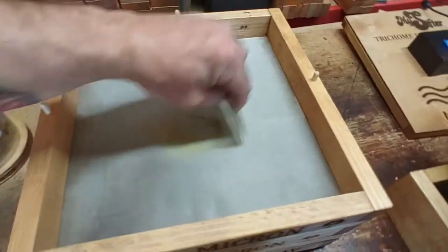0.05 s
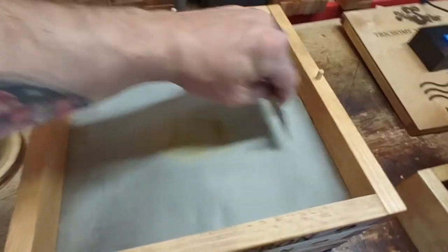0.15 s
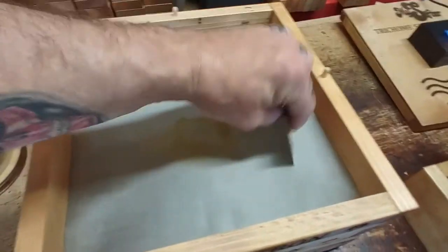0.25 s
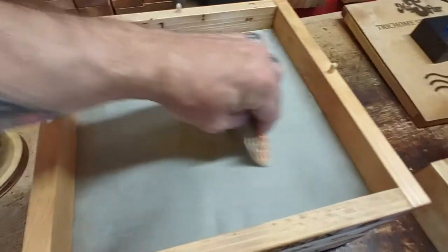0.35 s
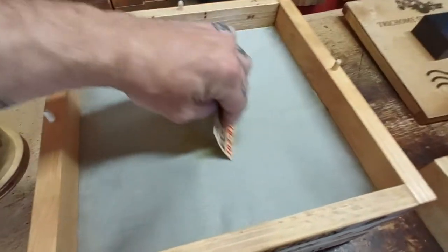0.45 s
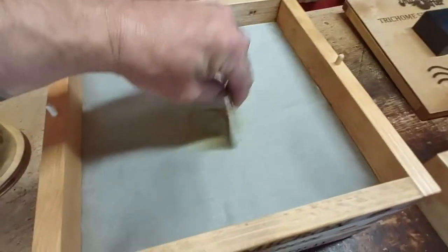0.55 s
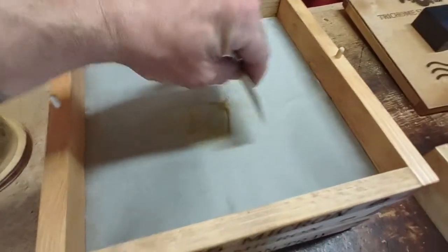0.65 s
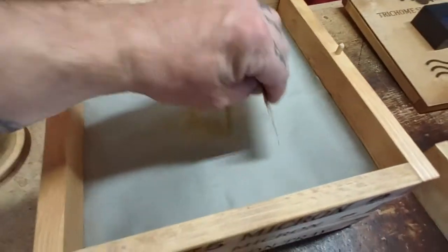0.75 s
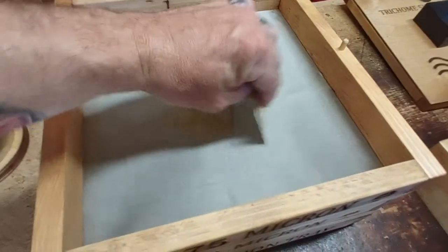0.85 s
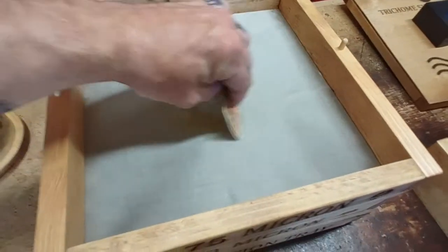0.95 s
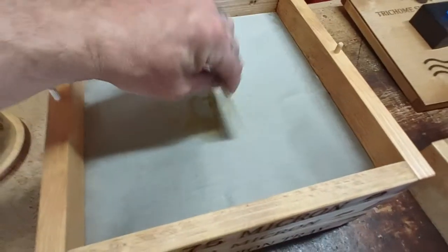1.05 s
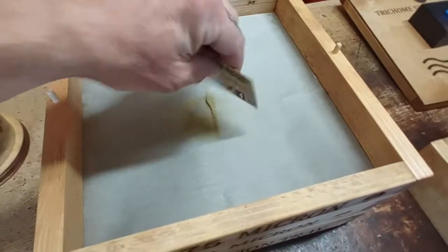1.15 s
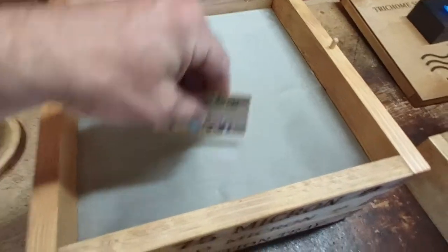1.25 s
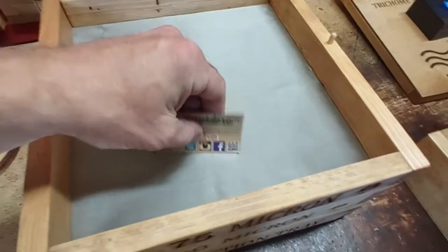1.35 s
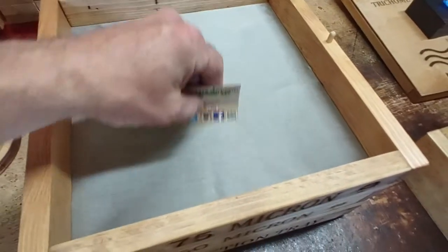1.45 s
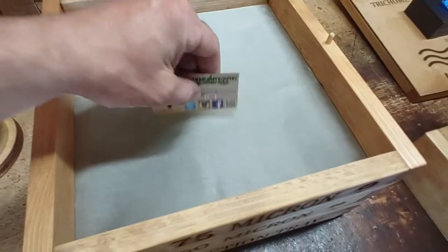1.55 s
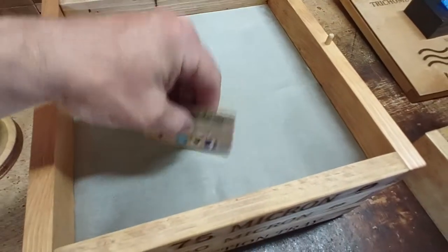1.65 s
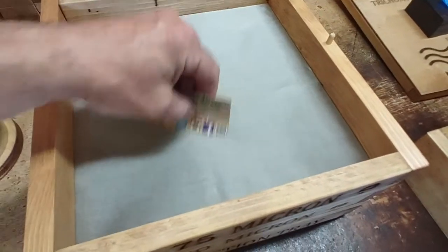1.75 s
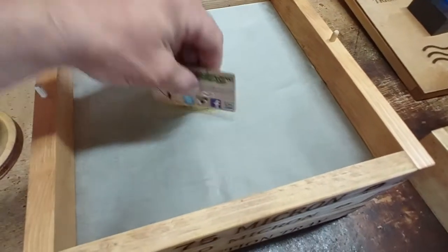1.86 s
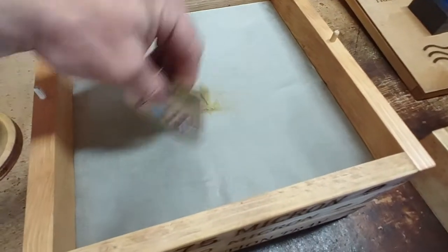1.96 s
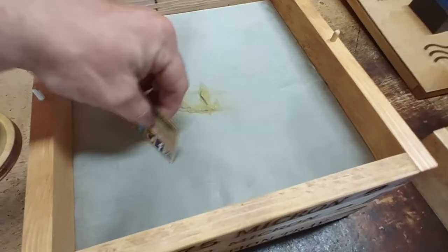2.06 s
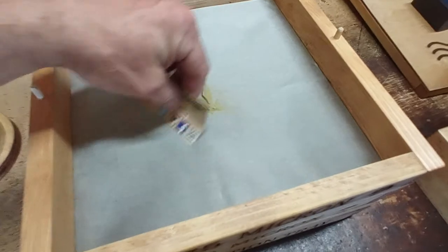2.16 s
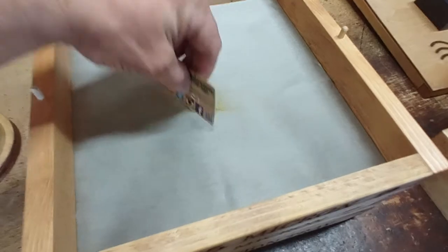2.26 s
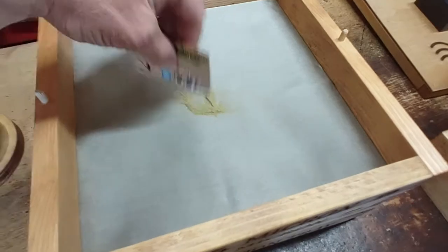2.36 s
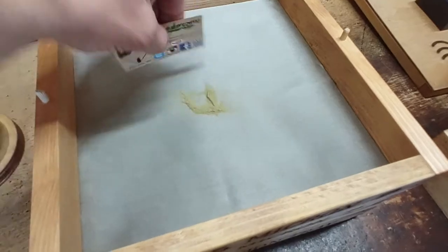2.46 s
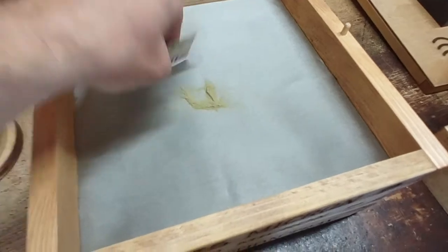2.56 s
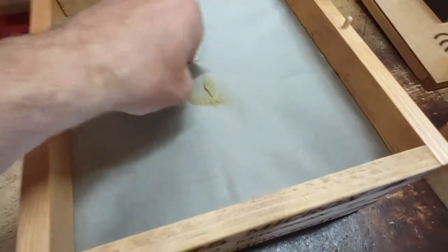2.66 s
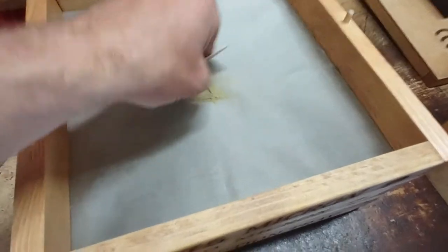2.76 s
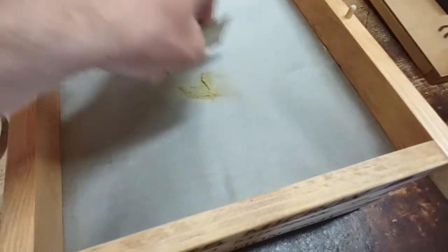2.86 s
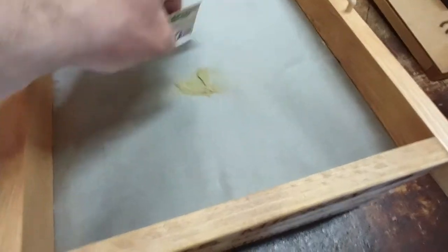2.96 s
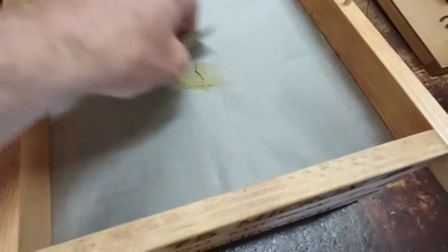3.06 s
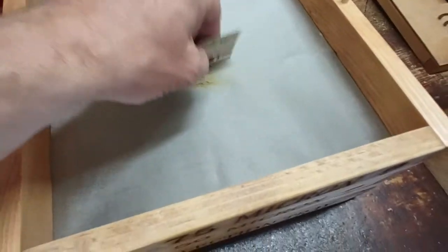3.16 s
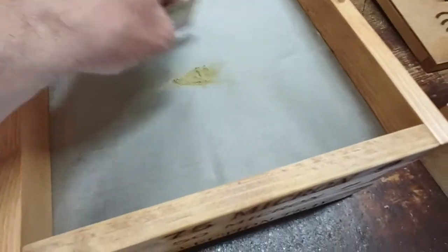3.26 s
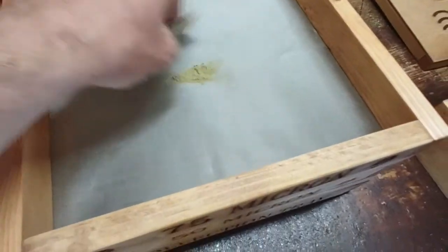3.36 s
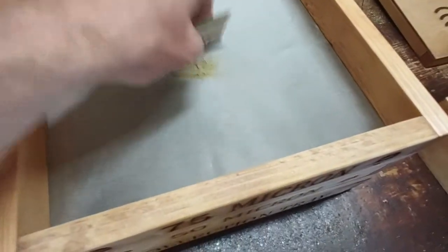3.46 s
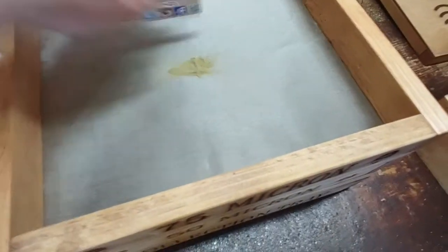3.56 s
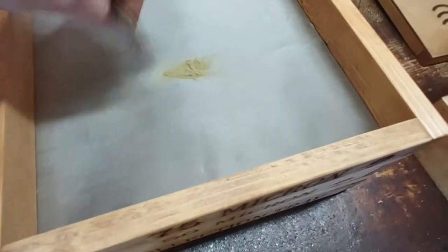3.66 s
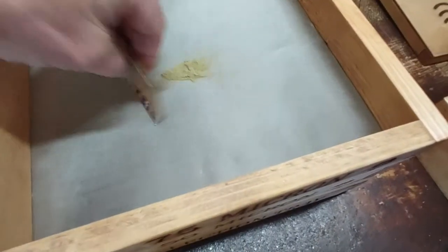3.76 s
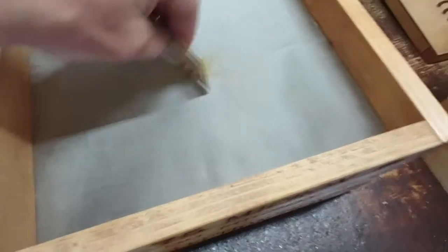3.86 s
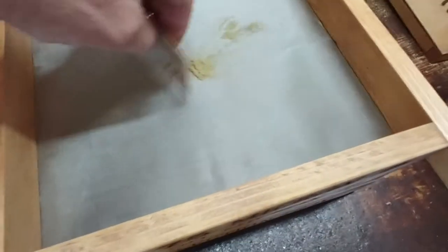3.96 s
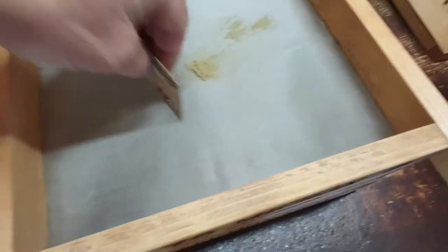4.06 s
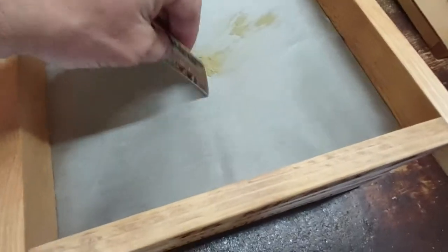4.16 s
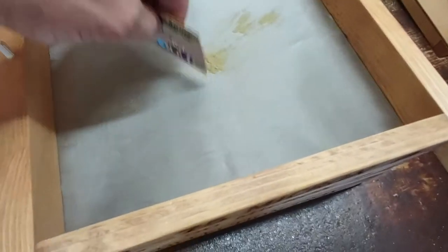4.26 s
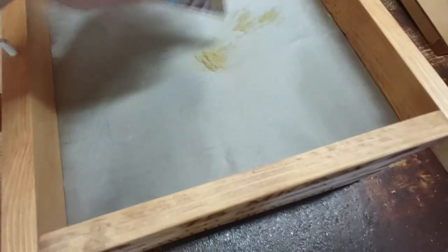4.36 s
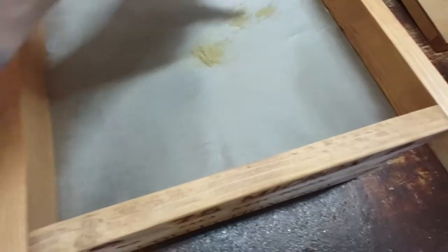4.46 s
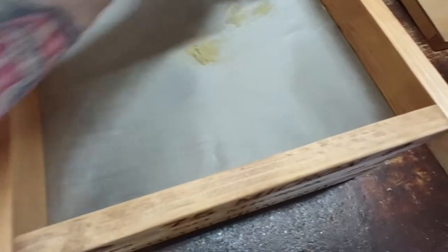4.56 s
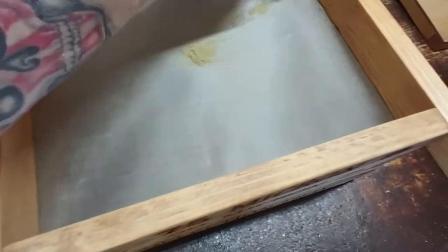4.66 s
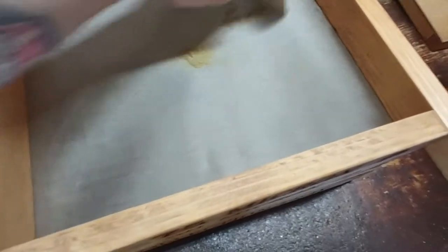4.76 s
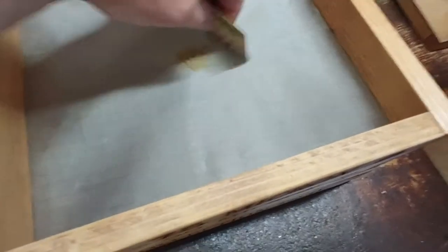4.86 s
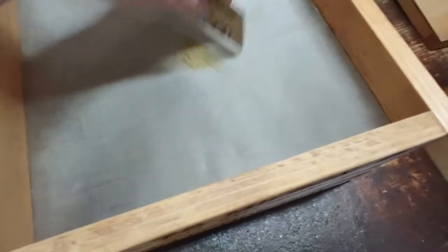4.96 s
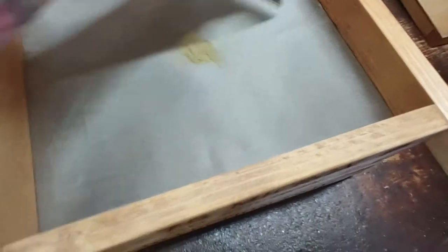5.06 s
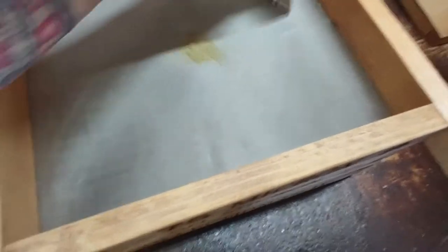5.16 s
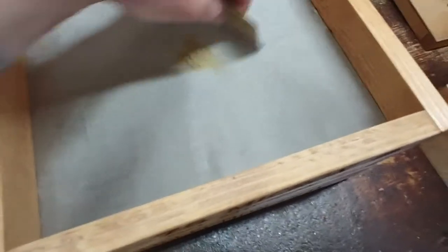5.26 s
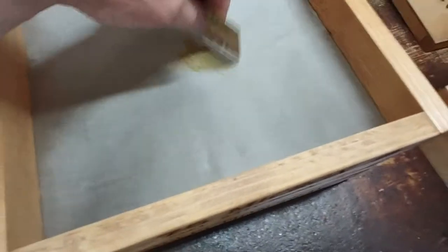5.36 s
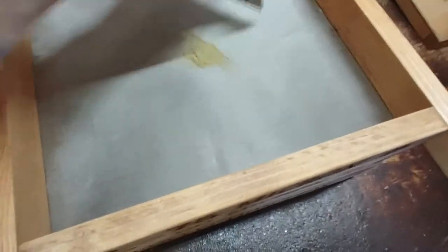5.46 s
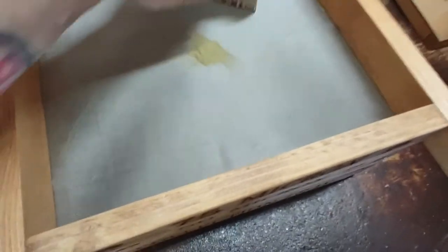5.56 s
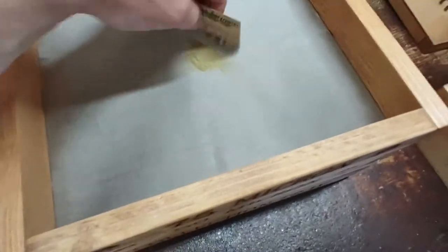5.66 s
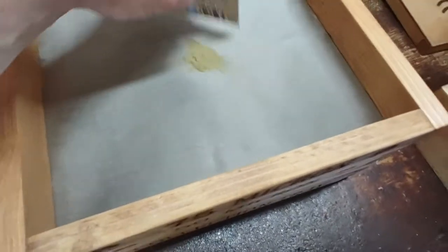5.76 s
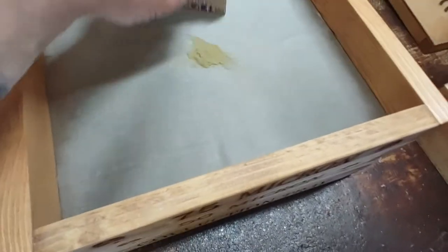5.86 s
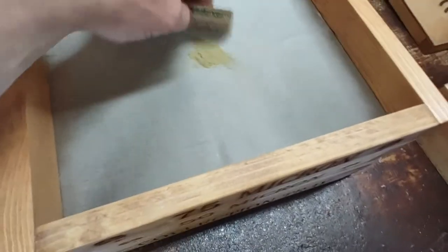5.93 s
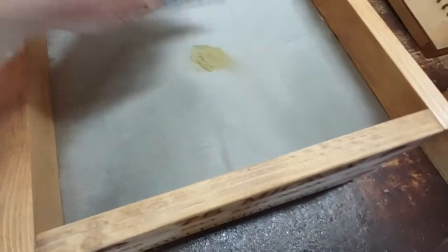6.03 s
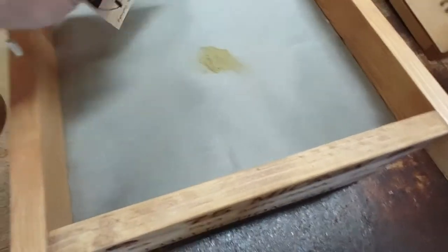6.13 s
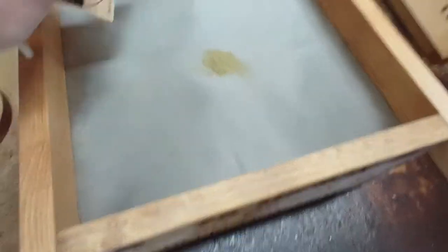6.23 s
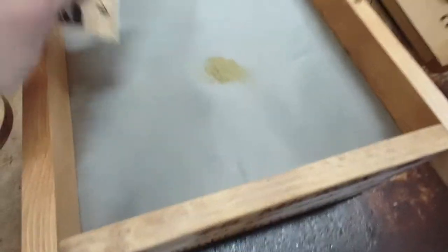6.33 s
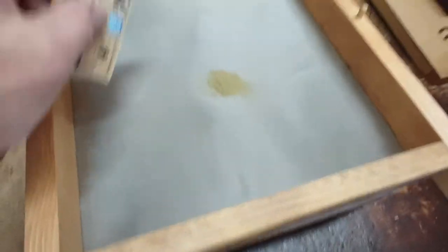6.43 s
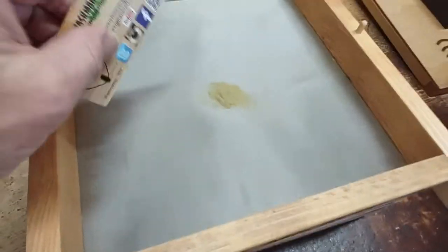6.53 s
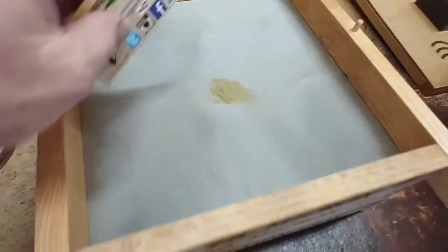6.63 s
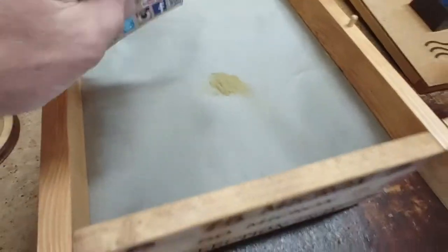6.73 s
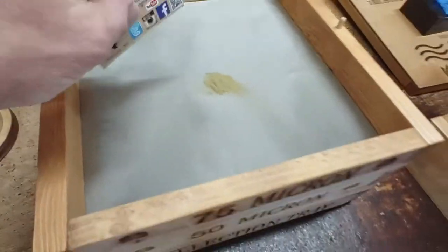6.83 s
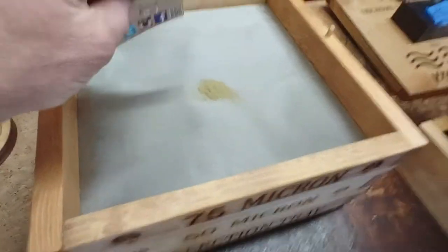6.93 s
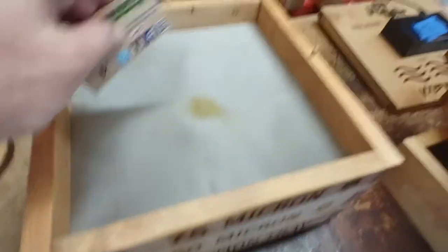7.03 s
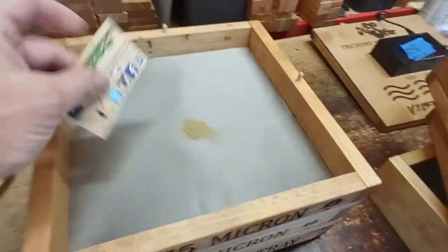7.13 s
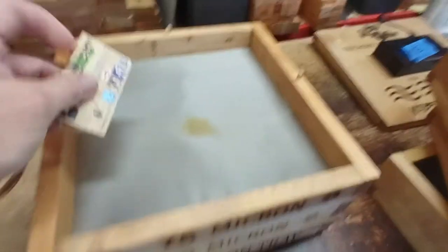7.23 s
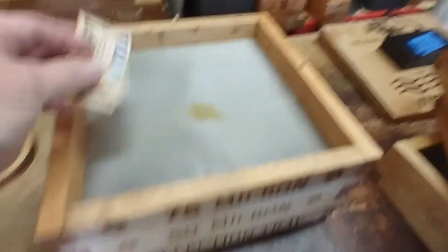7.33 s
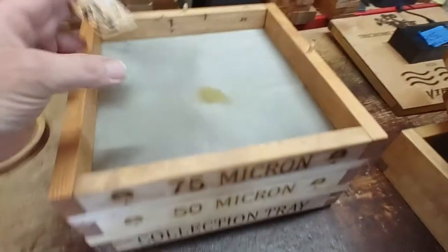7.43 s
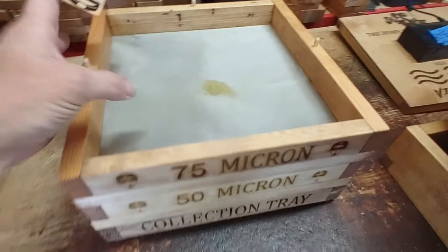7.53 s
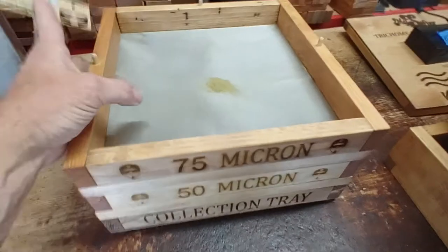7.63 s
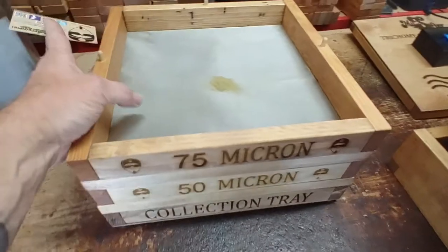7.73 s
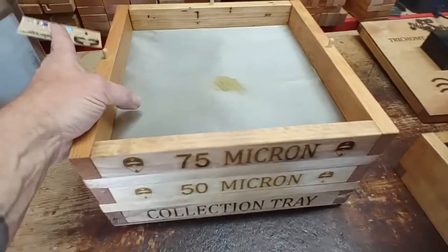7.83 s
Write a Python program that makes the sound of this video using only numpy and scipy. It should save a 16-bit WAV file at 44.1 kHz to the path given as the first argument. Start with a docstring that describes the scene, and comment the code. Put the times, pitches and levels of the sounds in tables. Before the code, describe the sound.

Crisp, gritty card scrapes and light taps on a stretched screen, with a car passing dully beyond the walls and a few final clicks.

```python
"""Card sweeping powder over a mesh

Close by in a small room a plastic card sweeps powder across a fine mesh stretched in a wooden frame.
Its edge rasps, brushes and taps as random catches on the threads; the card, mesh and frame click, hum and
knock. A car passes outside as swelling filtered noise with a low boom and a singing tyre note, muffled by
the walls. Room tone murmurs and hisses throughout; at the end the card is slid onto the bench."""
import sys
import numpy as np
from scipy import signal
from scipy.fft import rfft, irfft, next_fast_len
from scipy.io import wavfile
from scipy.ndimage import uniform_filter1d

SR = 44100
rng = np.random.default_rng(int(sys.argv[2]) if len(sys.argv) > 2 else 0)


def to_wav(s):
    """Save 16-bit WAV."""
    ch = np.atleast_2d(s).T  # columns
    pcm = np.round(np.clip(ch, -1, 1) * 32767)  # PCM
    wavfile.write(sys.argv[1], SR, pcm.astype(np.int16))


N = 347949
TIME = np.arange(N) / SR
TOUCH_SAMPLES = SR // 4
BRUSH_ONSET_S, BRUSH_FADE_DB_PER_S = .015, 299.5   # shared by the brushing and the slide


def from_db(db):
    """Decibels to gain."""
    return 10 ** (np.asarray(db) / 20)


def rms_one(x):
    """Scale to unit power."""
    return x / np.sqrt(np.mean(x ** 2) + 1e-20)


def freqs(n):
    """Frequencies in Hz of the bins of n samples, at least 1."""
    return np.maximum(np.arange(n // 2 + 1) * SR / n, 1)


def at_hz(points, hz):
    """Read a spectrum on a log-frequency axis."""
    f, value = np.transpose(points)
    return np.interp(np.log(hz), np.log(f), value)


def bell(hz, centre_hz, width):
    """Shape of a resonance, 1 on top; width is a share of the centre."""
    return 1 / (1 + (2 * (hz - centre_hz) / (width * centre_hz)) ** 2)


def panned(x, pan_db):
    """Make the left side of a stereo sound pan_db louder against the right."""
    return x * from_db([[pan_db / 2], [-pan_db / 2]])


def add(out, x, start_s):
    """Mix a stereo sound in at a time."""
    i = max(int(start_s * SR), 0)
    out[:, i:i + x.shape[1]] += x[:, :max(N - i, 0)]


def dying_noise(t60, size=16384):
    """A dense cloud of modes dying away, different on each side, of unit energy a side on average."""
    cloud = rng.standard_normal((2, size)) * from_db(-60 * np.arange(size) / SR / t60)
    return cloud / np.sqrt(np.sum(cloud ** 2) / 2)


def judder(n, depth_db, rate_hz):
    """Uneven grip: a gain that wavers at random, with depth_db as its rms swing."""
    slow = irfft(rfft(rng.standard_normal(n)) / (1 + (freqs(n) / rate_hz) ** 2), n)
    return from_db(depth_db * rms_one(slow))


def gesture(t, start_s, end_s, attack_s, release_db_per_s, growth_db=0, arch_db=0):
    """Gain of one movement: a ramp up, a hold that grows and arches, a dying release."""
    along = np.clip((t - start_s) / (end_s - start_s), 0, 1) - .5
    hold_db = growth_db * along - arch_db * (2 * along) ** 2
    release_db = release_db_per_s * np.maximum(t - end_s, 0)
    return np.clip((t - start_s) / attack_s, 0, 1) * from_db(hold_db - release_db)


def diffuse(spectrum):
    """Noise that fills the room: alike on both sides mainly in the bass. Rms 1."""
    # Each row: frequency in Hz, left-right level difference in dB.
    side_balance = [(60, -3), (110, 0.5), (200, -1.5), (380, -0.5), (700, 3.5), (1290, -4.5), (2380, -9.5),
                    (4400, 1), (8120, -7.5), (15000, 13)]
    # Each row: frequency in Hz, likeness of left and right from 0 to 1.
    side_likeness = [(60, 1), (130, 0.94), (290, 0.91), (640, 0.32), (1410, 0.01), (3100, 0.04),
                     (6820, 0.03), (15000, 0.01)]
    n = next_fast_len(N)
    hz = freqs(n)
    mid, side = rfft(rng.standard_normal((2, n)))
    alike = np.clip(at_hz(side_likeness, hz), 0, 1)
    sign = np.array([[1], [-1]])   # left, right
    both = np.sqrt(1 + alike) * mid + sign * np.sqrt(1 - alike) * side
    colour_db = at_hz(spectrum, hz) + sign * at_hz(side_balance, hz) / 2
    return rms_one(irfft(both * from_db(colour_db), n)[:, :N])


def wavering(hz, width_hz, size=8192):
    """A narrow resonance shaken at random, following a pitch curve; rms 1."""
    shake_hz = np.arange(size // 2 + 1) * SR / N
    shake = irfft(rfft(rng.standard_normal((2, size))) / (1 + (shake_hz / width_hz) ** 4))
    a, b = (np.interp(TIME, np.linspace(0, N / SR, size), part) for part in shake)
    phase = 2 * np.pi * np.cumsum(hz * np.ones(N)) / SR
    return rms_one(a * np.cos(phase) + b * np.sin(phase))


def glides(rows, width_hz, attack_s, release_db_per_s):
    """Short wavering tones that slide from one pitch to another."""
    out = np.zeros(N)
    for start_s, end_s, db, first_hz, last_hz in rows:
        hz = np.interp(TIME, [start_s, end_s], [first_hz, last_hz])
        swell = gesture(TIME, start_s, end_s, attack_s, release_db_per_s)
        out += from_db(db) * swell * wavering(hz, width_hz)
    return out


def rasp(n, colour_db, catches_per_s=5000, spread_db=4.5, ring_t60=.035, ring_db=3.5, lag_s=.00018,
         shift_db=3.5, ring_db_per_octave=1.5, count=3):
    """Spots of the edge catch on thread after thread, each ringing the mesh in its own way; levelled stereo."""
    # The rasp as it reaches each side. Each row: frequency in Hz, relative level in dB per Hz.
    left_colour, right_colour = [(330, -24.5), (720, -6.5), (1100, -17.5), (1440, 0.5), (2020, -3.5),
                                 (3060, 1), (5110, -0.7), (6930, -6.5), (8830, -18), (10320, 3), (11730, 0),
                                 (13370, -22.5), (15500, -29)], [(330, -19.5), (820, -9), (1080, -11), (1330, 2.54),
                                                    (2570, 10.5), (4590, -3.5), (5340, 6), (6540, -5),
                                                    (9030, -0.5), (10030, -23), (11330, -12), (12070, -17),
                                                    (12890, -37), (15500, -24.5)]
    # Resonances of mesh and frame. Each row: frequency in Hz, boost in dB.
    mesh_modes = [(516, 10), (861, 5.5), (1076, 0), (1378, 7.5), (2454, -0.5), (3014, 1), (3875, 2.5),
                  (5512, 1), (7149, 4.5), (8527, 5), (10206, 1.5), (11025, 0)]
    hz, sound = freqs(n), 0
    direct = np.exp(2j * np.pi * hz * np.array([[lag_s], [0]]))   # reaches the left side first
    # the treble scatters more
    ringing = from_db(ring_db + ring_db_per_octave * np.log2(np.maximum(hz / 2000, 1)))
    for spot in range(count):
        sizes = from_db(spread_db * np.minimum(rng.exponential(1, n), 4)) * rng.choice([-1, 1], n)
        load = np.minimum(judder(n, depth_db=shift_db, rate_hz=15), 2)   # the load shifts along the edge
        catches = load * sizes * (rng.random(n) < catches_per_s / SR)
        paths = direct + ringing * rfft(dying_noise(ring_t60, size=2048), n)
        sound = sound + rfft(catches) * paths
    modes_db = sum(db * bell(hz, f, width=0.056) for f, db in mesh_modes)
    sides_db = np.array([at_hz(left_colour, hz), at_hz(right_colour, hz)])
    low_cut = 1 / (1 + (300 / hz) ** 4)   # an open mesh radiates no bass
    sound = irfft(sound * low_cut * from_db(sides_db + modes_db + colour_db), n)
    # the running power of the summed spots is evened out
    power = uniform_filter1d(np.mean(sound ** 2, axis=0), size=900, mode="wrap")
    return sound / np.sqrt(power + 1e-20)


def touch(colour_db, rise_s, t60):
    """A brief clump of catches that swells and dies."""
    t = np.arange(TOUCH_SAMPLES) / SR
    swell = np.minimum(t / max(rise_s, 1 / SR), 1) * from_db(-60 * t / t60)
    return rasp(TOUCH_SAMPLES, colour_db) * swell


def room_tone(level_db=-59, peak_width=0.062):
    """A steady low murmur under a faint, coloured hiss."""
    # Each row: frequency in Hz, relative level in dB per Hz.
    murmur = [(20, -34.5), (55, -2), (85, -7), (120, 2.5), (160, -11), (230, -5.5), (480, -6), (750, -16),
              (1800, -22), (2500, -22.5), (4400, -30.5), (9600, -35), (11500, -30), (13500, -58)]
    # Narrow peaks in the steady hiss. Each row: frequency in Hz, boost in dB.
    peaks = [(5500, 14), (8700, 3)]
    hz = np.geomspace(20, SR / 2, num=512)
    spectrum_db = at_hz(murmur, hz) + sum(db * bell(hz, f, peak_width) for f, db in peaks)
    return from_db(level_db) * diffuse(np.column_stack([hz, spectrum_db]))


def strokes(gain_db=0.22, drum_hz=760, drum_ring_db=2.5, bite_s=0.028, lift_off_db_per_s=699.5):
    """Each sweep bites into the threads, swells along its own arch and lifts off, in its own colour."""
    # Each row: start in seconds, lift in seconds, level halfway in dB before the common gain, growth from
    # start to lift in dB, arch of the middle over the ends in dB, drum of the mesh in dB, body of the card
    # in dB, brightness in dB, card ring in Hz, card ring in dB, left-right difference in dB.
    sweeps = [(0, .18, -19.5, 3.5, 6, -3.5, -3, 5.5, 1880, 6, -4),
              (0.177, 0.256, -31.5, -7.5, -6, 4.5, -0.5, 1, 2400, 4, -2),
              (0.601, 0.749, -23.5, 0.5, 8, .5, -1.5, 1.5, 2640, 1.5, -2.5),
              (1.087, 1.201, -19, 6, 5, 3.5, -4.5, -2, 1304, 8.5, -0.5),
              (1.425, 1.514, -18, 9, 5, 0, -4, 0.5, 1270, 3, 0),
              (1.78, 1.953, -22.5, 6.5, 6.5, 5.5, -2, 1.5, 4500, 3.5, 3),
              (2.356, 2.513, -29.5, 7, -3, 1.5, -3, -0.5, 1740, 1, -1),
              (2.735, 2.867, -25, 16, 8.5, 4.5, -6, -1.5, 3350, -1, -0.5),
              (3.043, 3.159, -26, 5.5, 4, 1, -7, -2, 1545, 13, -1),
              (3.496, 3.549, -18, 14.5, 4, -1.5, -10.5, 2, 4750, 4.5, 2.5),
              (3.818, 3.855, -19, -2.5, -1, 0.5, -5.5, 0.5, 5600, 2.5, 2.5),
              (4.398, 4.6, -18, 5, 3.5, -7, -8.5, -0.5, 1240, 12.5, 1.5),
              (4.887, 5.044, -18, 3.5, 4.5, -7, -9, -2.5, 1240, 14, 1),
              (5.285, 5.382, -19.5, -0.5, -2.5, -10, -9.5, -3, 1295, 14, 0.5),
              (5.591, 5.658, -19, -6.5, -5, -11, -11, -3, 1300, 14, 1)]
    out, n = np.zeros((2, N)), SR // 2
    hz, t = freqs(n), np.arange(n) / SR
    for start_s, lift_s, db, growth_db, arch_db, drum_db, body_db, bright_db, ring_hz, ring_db, pan_db in sweeps:
        tilt = [(800, drum_db), (1500, body_db), (2300, 0.0038), (5000, 0.005), (8500, bright_db)]
        card_ring_db = ring_db * bell(hz, ring_hz, width=0.084)
        mesh_ring_db = drum_ring_db * bell(hz, drum_hz, width=.15)
        colour_db = at_hz(tilt, hz) + card_ring_db + mesh_ring_db
        hold = gesture(start_s + t, start_s, lift_s, bite_s, lift_off_db_per_s, growth_db, arch_db)
        pressure = from_db(db) * hold * judder(n, depth_db=.5, rate_hz=23)
        add(out, panned(rasp(n, colour_db) * pressure, pan_db), start_s)
    return from_db(gain_db) * out


def mesh_hum():
    """The pressed mesh hums like a drumhead and sinks as the card lets go."""
    # Each row: start in seconds, end in seconds, level in dB, first pitch in Hz, last pitch in Hz.
    hums = [(.155, .265, -46.5, 477, 414)]
    return glides(hums, width_hz=60, attack_s=0.015, release_db_per_s=298)


def brushing(hiss_pan_db=4.5):
    """Trailing lightly back over the mesh, the edge gives a thin, whistly hiss and a faint rub."""
    # Each row: start in seconds, end in seconds, hiss in dB, rub in dB, growth from start to end in dB.
    returns = [(0.265, 0.342, -53, -59.5, -9), (0.419, 0.44, -59.5, -82, -7),
               (0.757, 0.932, -49, -65.5, -3), (0.959, 1.09, -52.5, -59, 13),
               (1.253, 1.412, -56.5, -82, -4), (1.553, 1.742, -65.5, -62, -9), (1.977, 2.08, -48, -64, -4),
               (2.082, 2.35, -49, -66, 5.5), (2.539, 2.717, -53, -66, -8), (2.887, 2.992, -67, -67, -6)]
    # Each row: frequency in Hz, relative level in dB per Hz.
    thin_hiss = [(1500, -37.5), (6000, -24.5), (8500, -16.5), (10400, -8), (11800, -7.5), (12500, -3.5),
                 (16000, -2)]
    # Whistly peaks in that hiss. Each row: frequency in Hz, boost in dB.
    whistles = [(10450, 1), (11450, 6.5)]
    out, n = np.zeros((2, N)), SR // 2
    hz, t = freqs(n), np.arange(n) / SR
    hiss_colour = at_hz(thin_hiss, hz) + sum(db * bell(hz, f, width=.025) for f, db in whistles)
    rub_colour = at_hz([(1000, 6.5), (2200, 6.5), (3500, -12), (7000, 1.0), (10000, -22)], hz)
    for start_s, end_s, hiss_db, rub_db, growth_db in returns:
        hiss = from_db(hiss_db) * panned(rasp(n, hiss_colour), hiss_pan_db)
        rub = from_db(rub_db) * rasp(n, rub_colour)
        pressure = gesture(start_s + t, start_s, end_s, BRUSH_ONSET_S, BRUSH_FADE_DB_PER_S, growth_db)
        add(out, (hiss + rub) * pressure * judder(n, depth_db=2.0, rate_hz=32), start_s)
    return out


def taps(gain_db=-15.0, usual_dull_db=-11.5, pan_share=0.2, rise_s=0.0054):
    """The edge lands on the mesh in a short burst of catches, each landing duller or thinner."""
    # Each row: middle of the rise in seconds, level in dB before the common gain, dullness in dB before
    # the usual is subtracted, left-right difference in dB before the pan share, 60 dB decay in seconds.
    landings = [(0.323, -41, 6, -6, 0.15), (0.5816, -31, -12, -5.5, 0.35), (0.876, -46, -35.5, 15, 0.078),
                (1.4102, -22.5, -9.5, 0, 0.12), (1.7436, -35.5, -19, -8, 1), (2.242, -26.5, -23, -13, 0.1),
                (2.2974, -24.5, 9, -9, 0.16), (2.5167, -26, -3, -3.5, 0.035), (2.7167, -31.5, -4, -8, 0.44),
                (3.2596, -29.5, -24.5, 19, 0.064), (3.469, -24, 0, 3, 0.46), (3.784, -35.5, -3, -0.5, 0.19),
                (4.3391, -32.5, 4, 6.5, 0.51), (4.8634, -23.5, 4, 4, 0.4), (5.2573, -32, -6.5, -5, 0.36),
                (5.5647, -12.5, -3, 21, 0.076)]
    out, hz = np.zeros((2, N)), freqs(TOUCH_SAMPLES)
    for s, level_db, dull_db, pan_db, t60 in landings:
        colour_db = at_hz([(2500, dull_db - usual_dull_db), (8000, 0)], hz)
        tap = from_db(level_db + gain_db) * touch(colour_db, rise_s, t60)
        add(out, panned(tap, pan_share * pan_db), s - rise_s / 2)
    return out


def squeaks():
    """Faint squeaks of the trailing edge, gliding in pitch, heard towards the right."""
    # Each row: start in seconds, end in seconds, level in dB before panning, first pitch in Hz, last in Hz.
    chirps = [(.97, 1.09, -66, 2537, 2230), (1.53, 1.61, -58.5, 2340, 2510)]
    return panned(glides(chirps, width_hz=150, attack_s=.02, release_db_per_s=259), pan_db=-14.0)


def clicks():
    """The card itself flicks and rings, each time at its own pitch."""
    # Each row: start in seconds, level in dB, ring in Hz, ring boost in dB, left-right difference in dB,
    # rise in seconds, 60 dB decay in seconds.
    flicks = [(1.747, -43, 1830, 22, 6, .004, 0.36), (2.238, -36.5, 2200, 19, 1, .0033, 0.071),
              (2.298, -37, 2000, 21.5, -5.5, 0.0015, 0.062), (4.341, -39.5, 4030, 24, 12, .002, .05),
              (4.343, -45, 2610, 22, 1, 0.0018, 0.05), (5.778, -51.5, 11040, 7, 2, .004, 0.062),
              (6.041, -41, 5260, -7, 7, 0.0042, 0.14), (6.067, -27, 2950, 11, 1, 0.0013, 0.036),
              (6.41, -42.5, 3200, 2.5, -1, 0.0034, 0.089), (6.611, -34.5, 1810, 22.5, 2, .0012, 0.049),
              (7.6415, -29, 10850, 27.5, 3, .0004, 0.0099), (7.696, -40, 10800, 18, 5, 0.0022, .04),
              (7.697, -42, 3530, 25, 5, .002, 0.056), (7.728, -39.5, 3320, 31, 4.5, .001, 0.03)]
    out, hz = np.zeros((2, N)), freqs(TOUCH_SAMPLES)
    for s, db, ring_hz, ring_db, pan_db, rise_s, t60 in flicks:
        click = from_db(db) * touch(ring_db * bell(hz, ring_hz, width=0.23), rise_s, t60)
        add(out, panned(click, pan_db), s)
    return out


def thumps(t60=.22, rise_s=0.027):
    """The hand nudges the wooden frame: dull knocks of low noise that swell softly and die."""
    # Each row: start in seconds, level in dB from which the decay sets out.
    nudges = [(2.299, -40), (2.324, -54), (7.755, -44.5)]
    # Each row: frequency in Hz, relative level in dB per Hz.
    knock_colour = [(25, -40), (60, -22), (120, -11), (230, -6.5), (400, -10.5), (700, -16), (4000, -78)]
    swell = np.zeros(N)
    for s, db in nudges:
        decay_db = 60 * np.maximum(TIME - s, 0) / t60
        swell += np.clip((TIME - s) / rise_s, 0, 1) * from_db(db - decay_db)
    return swell * diffuse(knock_colour)


def passing(loudest_s, db, approach_db_per_s, retreat_db_per_s, rounding_s):
    """Gain of something going by: its dB fall steadily away from the loudest moment, with a rounded top."""
    away_s = np.hypot(TIME - loudest_s, rounding_s) - rounding_s   # a negative rounding lowers the whole pass
    return from_db(db - away_s * np.where(TIME < loudest_s, approach_db_per_s, retreat_db_per_s))


def car(boom_hz=221, room_t60=0.13):
    """Tyre roar leads, the rumble follows; both arrive through the modes of the room, with a low boom."""
    # The car through the walls. Each row: frequency in Hz, relative level in dB per Hz.
    rumble_colour, roar_colour, tyre_colour = [(30, -46.5), (80, -26), (135, -10), (185, -3.5), (230, 2),
                                               (290, -11.5), (362, -1), (420, -3.5), (520, -45.5),
                                               (1500, -82)], [(120, -66.5), (330, -19.5), (440, -3),
                                                               (520, 1.5), (610, 1), (730, 3.5),
                                                               (850, -9.5), (1000, -8), (1300, -30.5),
                                                               (4000, -77.5)], [(250, -60.5), (700, -9.5),
                                                                             (1050, -1), (1500, -5),
                                                                             (1800, -7.5), (2200, -13),
                                                                             (3000, -20.5), (5000, -29.5),
                                                                             (9000, -68.5)]
    # Each pass: loudest moment in seconds, level in dB before the rounding, approach in dB per second,
    # retreat in dB per second, rounding of the top in seconds.
    rumble_pass, roar_pass = (6, -44.5, 9, 10.5, 0.36), (5.5, -39, 11.5, 12, 0.33)
    tyre_pass, boom_pass = (6.5, -51.5, 7.5, 20.5, 0.8), (6, -40, 20.5, 30, -0.27)
    # The boom wells up briefly. Each row: start in seconds, end in seconds, level in dB.
    boom_swells = [(4.607, 4.72, -46), (6.853, 6.957, -52)]
    rumble = diffuse(rumble_colour) * passing(*rumble_pass)
    roar = diffuse(roar_colour) * passing(*roar_pass)
    street = rumble + roar + diffuse(tyre_colour) * passing(*tyre_pass)
    street = street * judder(next_fast_len(N), depth_db=1.5, rate_hz=12)[:N]   # the road is uneven
    modes = signal.fftconvolve(street, dying_noise(room_t60)[:1], axes=1)[:, :N]
    indoors = (street + modes) / np.sqrt(2)
    boom_gain = passing(*boom_pass)
    for start_s, end_s, db in boom_swells:
        boom_gain += from_db(db) * gesture(TIME, start_s, end_s, attack_s=.035, release_db_per_s=79.5)
    return indoors + boom_gain * wavering(boom_hz, width_hz=10) + tyre_song()


def tyre_song(middle_hz=653, swing=.075, middle_s=4.3, glide_s=.55, width_hz=60):
    """The tread sings a wavering note that sinks through its middle pitch; swing is a share of that pitch."""
    # The row: start in seconds, end in seconds, level in dB.
    start_s, end_s, db = (4.075, 6.06, -45.5)
    hz = middle_hz * (1 - swing * np.tanh((TIME - middle_s) / glide_s))
    swell = gesture(TIME, start_s, end_s, attack_s=0.24, release_db_per_s=27)
    return from_db(db) * swell * wavering(hz, width_hz)


def slide():
    """The card is pushed flat onto the bench: one short, growing rasp."""
    # The row: start in seconds, end in seconds, level halfway in dB, growth in dB.
    start_s, end_s, db, growth_db = (7.823, 7.886, -46.5, 18)
    # Each row: frequency in Hz, relative level in dB per Hz.
    bench_colour = [(1000, -33), (2900, -18), (3400, 6), (3900, -7), (4500, 5), (5600, 0.5), (6500, -13),
                    (9000, -1), (12000, -7), (16000, -16)]
    out = np.zeros((2, N))
    add(out, rasp(TOUCH_SAMPLES, at_hz(bench_colour, freqs(TOUCH_SAMPLES))), start_s)
    push = gesture(TIME, start_s, end_s, BRUSH_ONSET_S, BRUSH_FADE_DB_PER_S, growth_db)
    return from_db(db) * out * push


def room(x, t60=0.2, wet_db=-18.5, wall_hz=7000, gap_s=.006):
    """A short, slightly dull tail from the walls."""
    tail = signal.sosfilt(signal.butter(1, wall_hz, fs=SR, output="sos"), dying_noise(t60))
    tail = np.pad(tail, ((0, 0), (int(gap_s * SR), 0)))
    return x + from_db(wet_db) * signal.fftconvolve(x, tail, axes=1)[:, :N]


def scene():
    """The card on the mesh, close by, over the street and the room tone."""
    card = strokes() + mesh_hum() + brushing() + taps() + squeaks() + clicks() + slide()
    return room(card) + thumps() + car() + room_tone()


def record(dry, low_cut_hz=32, top_cut_hz=15650):
    """The deepest bass is rolled off and the top is cut steeply."""
    dry = signal.sosfilt(signal.butter(2, low_cut_hz, "high", fs=SR, output="sos"), dry)
    return signal.sosfilt(signal.ellip(12, .1, 90, top_cut_hz, fs=SR, output="sos"), dry)


dry = scene()
out = record(dry)
to_wav(out)
```